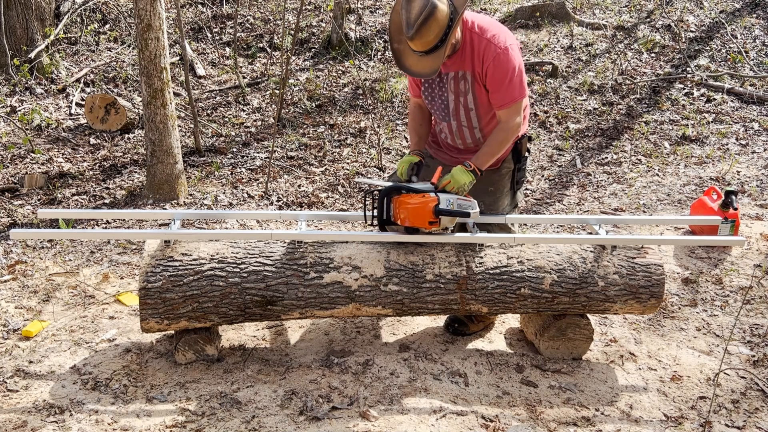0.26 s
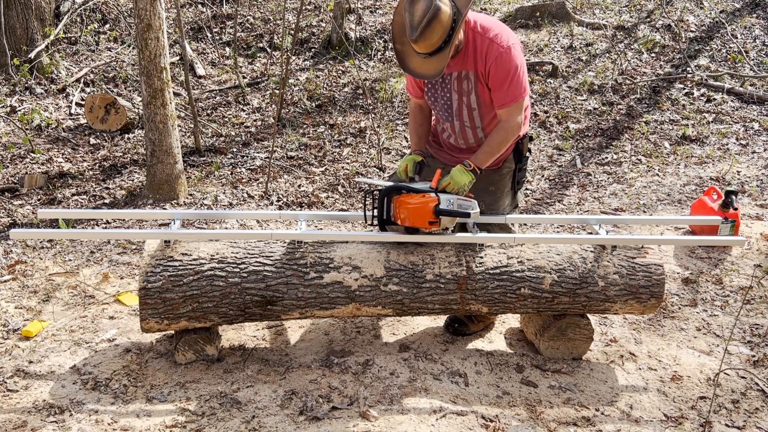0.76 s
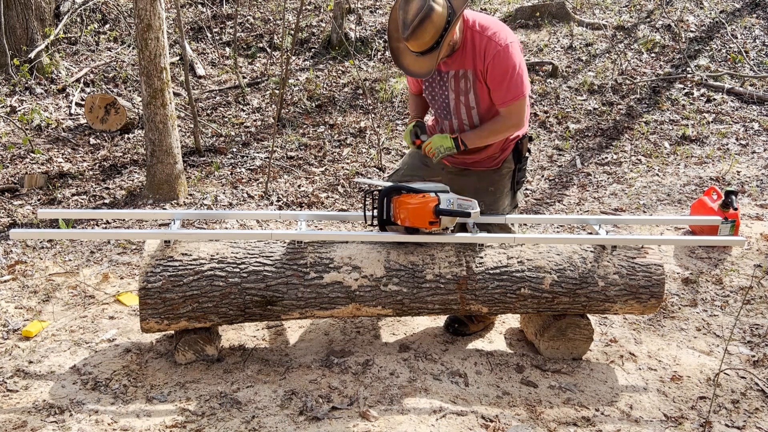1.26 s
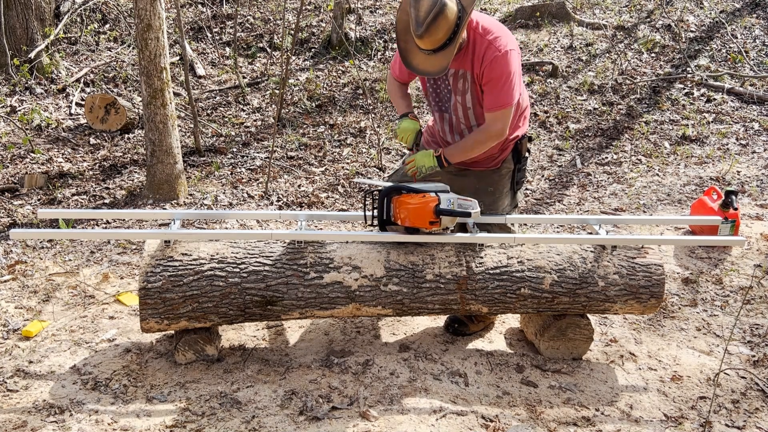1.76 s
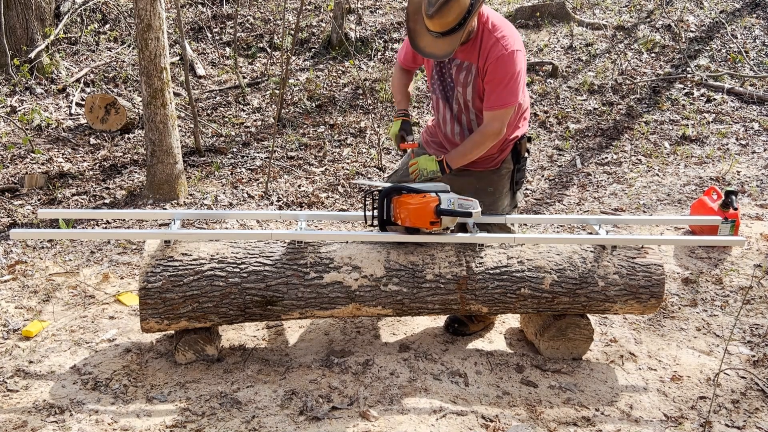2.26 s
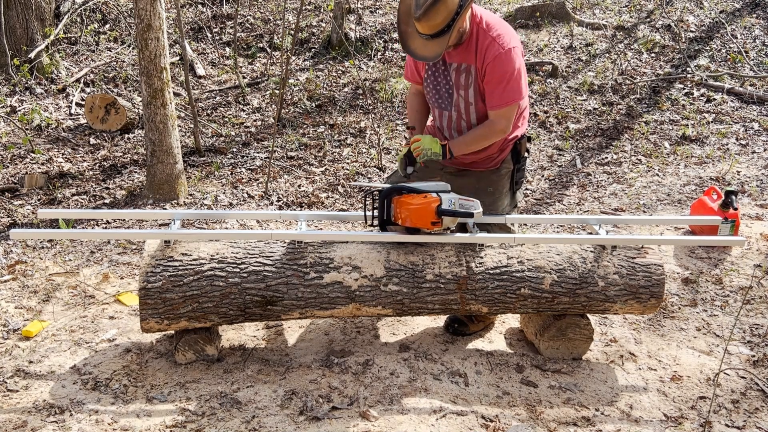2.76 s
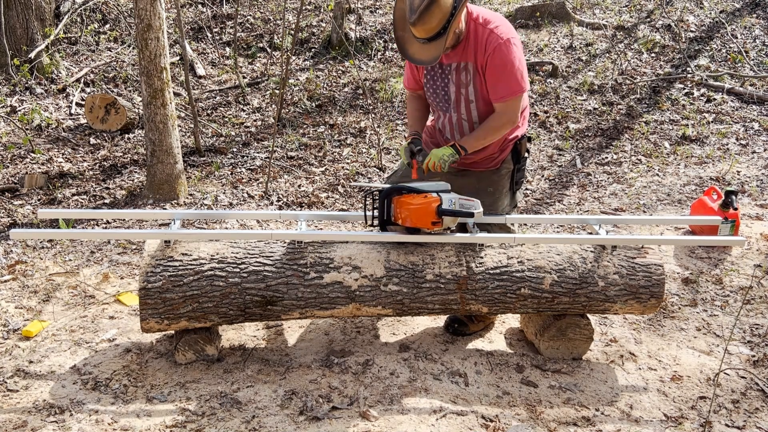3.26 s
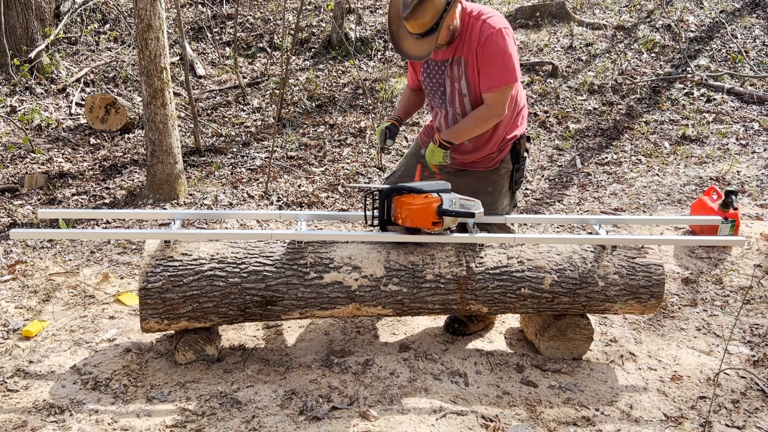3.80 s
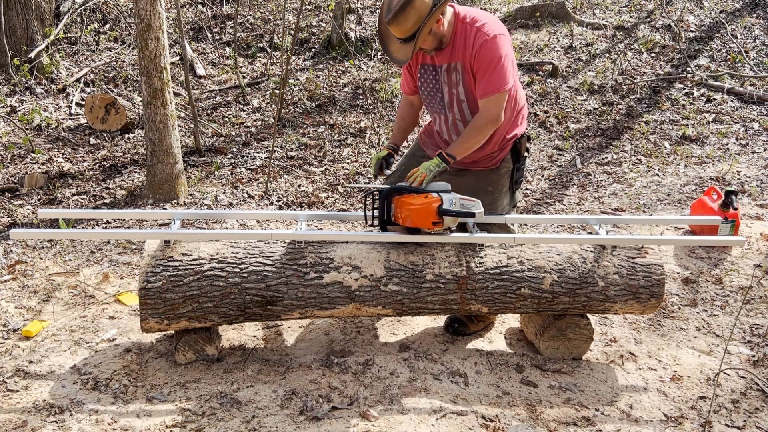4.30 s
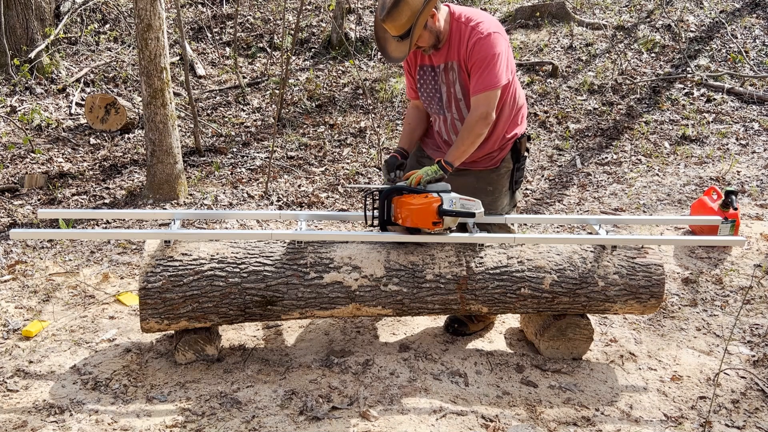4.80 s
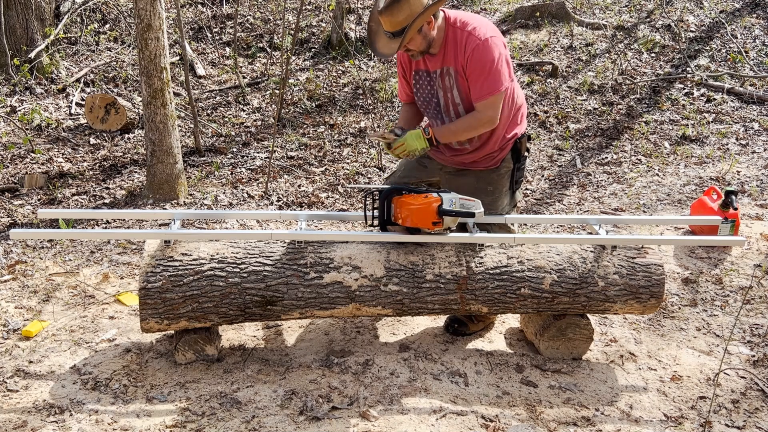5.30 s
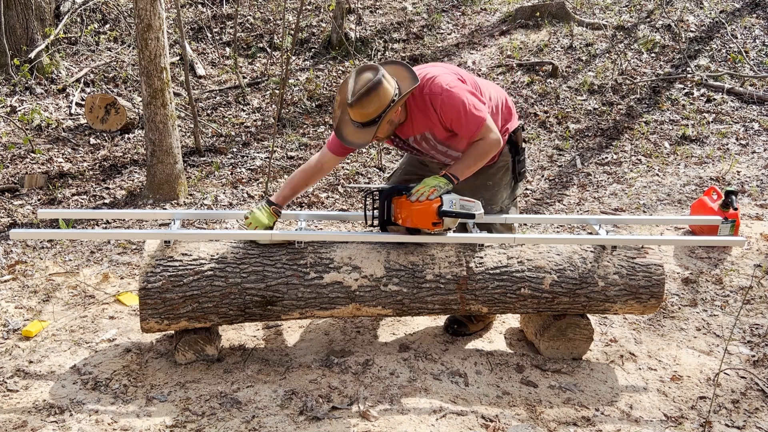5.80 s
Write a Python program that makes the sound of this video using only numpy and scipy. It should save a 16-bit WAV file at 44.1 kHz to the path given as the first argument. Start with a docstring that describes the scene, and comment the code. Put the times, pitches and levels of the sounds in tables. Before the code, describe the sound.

Close handling of small metal parts in a quiet wood. Faint ticks and isolated dry clacks come first, then a tight run of knocks and a bright, jangling steel clatter at its loudest. A dull bump follows, then near silence, glove brushing, and a few short taps on a metal rail. A very high, thin bird whistles upward; faint rumble and blurred animal chorus lie behind. Stereo, mostly dry, with slight tree echo.

```python
"""Work on a chainsaw in a quiet wood

Gloved hands work on a saw lying on a log. Small parts click and tap as noise bursts through resonances, a steel
tool rings against the chain as decaying modes, gloves and hard parts rub as gritty noise, and dull low sounds
are damped tones with noise. A very high bird whistles upward on gliding sines, with short falling chips. Behind lie
shaped noises for a far rumble, a blurred animal chorus and a hiss, dipping briefly early on, and a faint engine."""
import sys
import numpy as np
from scipy import signal
from scipy.fft import rfft, irfft, next_fast_len
from scipy.io import wavfile
from scipy.ndimage import uniform_filter1d

SR = 44100
rng = np.random.default_rng(int(sys.argv[2]) if len(sys.argv) > 2 else 0)


def store_pcm(level_fs):
    """Save levels as 16-bit WAV."""
    pcm = np.round(np.clip(level_fs, -1, 1) * 32767).astype(np.int16)
    wavfile.write(sys.argv[1], SR, np.atleast_2d(pcm).T)


N = 266805  # length in samples

# Contacts of small parts. Each row: start in seconds, knock level in dB, knock pitch in Hz,
# treble tick in dB relative to the knock, casing ring in dB relative to the knock.
CONTACTS = [(.115, -52.5, 1010, 5.5, 2), (0.2119, -49, 1930, 4, -19), (0.216, -47.5, 1500, 0, -4),
            (0.223, -49, 1510, -5, -17), (.345, -56.5, 925, 1.5, -2), (.648, -31.5, 2980, -19, -15),
            (0.811, -54.5, 1940, 9, -18), (0.9624, -34, 3500, -16, -25), (.9638, -25.5, 1880, -29, -8.5),
            (.9652, -27, 955, -33, -12), (1.199, -55.5, 2270, 5.5, -30), (1.581, -51, 3300, -19, -1),
            (1.622, -56, 1500, 0, -2), (1.639, -51, 880, -1, 1), (1.787, -59.5, 1510, -5, -1),
            (1.812, -49.5, 1760, -22, -5), (1.828, -46, 1120, -16, -14), (1.835, -44.5, 1500, -19, -3),
            (2.426, -47.5, 1130, -1.5, -19), (2.642, -52, 2570, 5.5, -2), (2.9292, -18, 1900, -13, -6),
            (3.21, -58.5, 1150, 4.5, 9), (3.341, -28.5, 2000, -27, -5), (3.356, -28, 1870, -5, -9),
            (3.4073, -23.5, 3650, -29, -10.5), (3.466, -31.5, 2220, -17, -30), (3.48, -34.5, 1930, -23, -1),
            (3.764, -52.5, 1000, 9, 5), (3.939, -36.5, 2330, -10, 1), (3.969, -34, 2100, -9, -14.5),
            (3.975, -22, 2040, -8.5, -18), (3.9869, -11, 4200, -8, -9), (3.9906, -16, 1193, -5.5, 1),
            (4.004, -17.5, 4180, -9, -20.5), (4.012, -28, 1797, -14.5, -7), (4.04, -47, 1142, 9, -9.5),
            (4.0494, -27, 12580, -9, -14), (4.0545, -30, 13260, -12, -21), (4.124, -42, 3020, 6, -5.5),
            (4.163, -27, 11970, -2.5, -21), (4.165, -10, 4020, -2.5, -22), (4.1666, -15, 1622, -7, -11.5),
            (4.187, -14.5, 4740, -0.5, -22), (4.2077, -19.5, 6500, 0, -18),
            (4.2142, -25, 5210, -3.5, -19.5), (4.76, -46, 2250, -24, -10), (4.763, -38.5, 1592, -29, -9),
            (5.052, -44.5, 1500, -24, -4), (5.0568, -47.5, 1800, -18, 5), (5.0825, -40, 2140, -3, 3),
            (5.087, -39.5, 1100, -14, -3), (5.141, -49, 1700, -16, -4), (5.745, -44.5, 770, -30, -5.5)]
# Modes of the saw's casing. Each row: pitch in Hz, width in Hz, level in dB.
CASING_MODES = [(1077, 180, 3), (1969, 180, -2), (4350, 260, -9), (4870, 220, -16)]
KNOCK_Q, RING_Q, RING_DB = .8, 11, 1.5  # broad knock, and the knocked part's own short ring
PUSH = 4  # height of the first clean push against noise of rms 1
CONTACT_FALL_S, SHORTER = 0.0086, 0.31  # time to fall 50 dB at 2 kHz; exponent by which higher parts die faster
TICK_HZ, TICK_T60_S = 6000, 0.0028
CASING_LAG_S, CASING_DETUNE, CASING_SCATTER_DB = 0.00149, 0.04, 3.5  # late uptake, shifts by the grip
SMALL_HZ = 780  # small parts radiate little below this

# Parts set down on the metal rail. Each row: start in seconds, level in dB, pitch in Hz.
RAIL_TAPS = [(5.822, -26.5, 2830), (5.832, -31, 2970), (6.012, -20.5, 2890), (6.038, -15.5, 2830)]
TAP_S, TAP_TREBLE_DB = 0.0028, -15.5

# Blows on the loose steel tool. Each row: start in seconds, strength in dB, share of the free ring time
# left by the grip, tilt in dB per octave, loss in dB that the new contact puts on earlier ringing.
BLOWS = [(3.987, -35, 0.22, -2.5, 0), (4.003, -45, 0.27, 3, 4), (4.166, -25.5, 1, 1.5, 0),
         (4.189, -30, 0.41, 4.5, 1), (4.206, -29, 0.86, 5, 11.5)]
# Pitch of each mode of the tool in Hz.
MODE_HZ = [1064, 3540, 4324, 5282, 6422, 6885, 7140, 8117, 9255, 9441, 9801, 10760, 11280, 14302, 14860]
# The same modes. Each row: level in dB, free ring time (t60) in seconds.
MODES = [(2.5, 0.2), (-11.5, 0.13), (-5, .07), (-8, 0.096), (-4, 0.1), (-4, 0.13), (-11.5, 0.28),
         (-14.5, 0.14), (-8.5, 0.17), (-3.5, 0.2), (-7.5, 0.11), (-24.5, 0.37), (-9, 0.055), (-7.5, 0.077),
         (-35.5, .16)]
LINKS, LINK_DB, LINK_T60_S = 60, -9.5, .07  # partials of the chain links: count, top level, middle ring time
# Single ringing tones: soft pings, and lasting rings of the struck steel near 4.0 and 4.2 s.
# Each row: start in seconds, level in dB, pitch in Hz, rise in seconds, t60 in seconds.
SINGLE_TONES = [(1.582, -57, 3546, 0.0017, 0.11), (4.004, -37.5, 4310, .0012, .09),
                (4.012, -51.5, 3530, .006, .17), (4.215, -46.5, 3540, .004, .14),
                (4.3, -53.5, 3534, 0.014, 0.36)]

# Rubbing strokes. Each row: middle in seconds, length in seconds, level in dB, bright share from 0 to 1.
STROKES = [(0.65, 0.024, -51, 0.46), (1.832, 0.039, -67, 0.4), (2.653, 0.038, -60.5, 0.34),
           (3.397, 0.012, -49, 0.18), (3.464, 0.019, -44.5, 0.17), (3.734, 0.21, -72, 0.18),
           (3.977, 0.011, -35, 0.33), (4.013, 0.087, -50, 0.25), (4.204, 0.061, -37, 0.36),
           (5.025, 0.029, -64.5, 0.1), (5.255, 0.074, -48, 0.8), (5.586, 0.059, -52, 0.83),
           (5.845, 0.1, -67.5, 0.4)]
# Spectrum of brushing fabric. Each row: frequency in Hz, relative density in dB per Hz.
FABRIC = [(1760, -45), (3000, -14), (6390, -3), (7910, -4.5), (9330, 0), (9730, -7.5), (15500, -17.5),
          (16200, -31)]
# Spectrum of scraping hard parts. Each row: frequency in Hz, relative density in dB per Hz.
HARD_PARTS = [(240, -58.5), (400, -15.5), (1490, -2.5), (1930, -5.5), (3220, -10), (3810, -7), (4570, -13),
              (9000, -21.5), (11700, -56.5)]
STROKE_EDGE = 2.6  # exponent of the stroke's envelope

# Dull low sounds: bumps of the saw on the log, and the low body of a brushing stroke near 5.2 s.
# Each row: start in seconds, level in dB, pitch in Hz, t60 in seconds, share of noise from 0 to 1.
DULL_SOUNDS = [(4.29, -43.5, 293, 0.058, 0.7), (4.429, -29.5, 163.5, 0.084, 0.36),
               (4.446, -36, 285, 0.044, 0.2), (4.47, -44.5, 194, 0.17, 0.18),
               (4.487, -43.5, 292, 0.075, 0.04), (5.222, -51.5, 580, 0.16, 0.8),
               (5.246, -44.5, 484, 0.094, 0.5), (5.744, -42.5, 402, 0.065, 0.42),
               (5.83, -39, 352, 0.081, 0.34)]
DULL_LOW_HZ = 89  # low cut

# Long notes of the bird. Each row: start in seconds, lowest pitch in Hz, dip into it in Hz,
# seconds until the rise, length in seconds, level in dB before the fade.
NOTES = [(0.479, 11530, 895, 0.011, 0.19, -46.5), (0.648, 12800, 1900, 0.03, 0.13, -47.5),
         (4.884, 11640, 896, 0.0168, .16, -45), (5.052, 12480, 2220, 0.026, .12, -43)]
# Short falling chips of the bird. Each row: start in seconds, end pitch in Hz, level in dB.
FALLING_CHIPS = [(1.814, 13300, -63), (3.815, 13840, -68), (4.663, 14540, -70), (5.95, 14050, -69)]
DIP_S, RISE_HZ_PER_S, RISE_SLOWS = 0.0048, 33000, 1.1  # time constant of the dip; rise and its slowing per s
ATTACK_S, RELEASE_S = 0.024, 0.022
FADE_DB, FADE_S = 21, 0.015  # a note thins out as it climbs
LEAN_HZ, LEAN_DB_PER_KHZ = 13200, -3  # centred pitch; change of left minus right level
CHIP_HZ, CHIP_S = 15940, 0.018  # where a chip starts, its length

# Far engine note. Each row: time in seconds, pitch in Hz, level in dB before the overall swell.
ENGINE = [(1.701, 214.8, -72), (2.1, 231.3, -57), (2.5, 228.3, -65), (2.9, 245.2, -65.5),
          (3.149, 229.1, -59.5), (3.499, 215.2, -64), (3.9, 197, -79)]
# Air of the wood. Each row: time in seconds, rumble in dB, chorus in dB, hiss in dB.
AIR_LEVELS = [(0, -62, -69, -79.5), (.9, -62, -67.5, -78), (1.12, -66, -69, -80), (1.25, -73.5, -74.5, -81),
              (1.55, -68, -67.5, -81.5), (1.75, -60.5, -68, -80.5), (2.5, -62.5, -66, -79.5),
              (3.499, -60, -66, -77.5), (4.5, -60.5, -66.5, -78), (5.2, -61.5, -66, -76),
              (6.05, -58.5, -68.5, -79.5)]
# Spectrum of the far rumble. Each row: frequency in Hz, relative density in dB per Hz.
RUMBLE_SPECTRUM = [(20, -28.5), (33, -48), (82, 0.5), (181, 4), (238, -2), (285, -6), (608, -13),
                   (797, -23.5), (1010, -17), (1300, -18.5), (1500, -28), (1950, -56)]
# Spectrum of the animal chorus. Each row: frequency in Hz, relative density in dB per Hz.
CHORUS_SPECTRUM = [(410, -20.5), (700, 1.5), (999, -2.5), (1300, -11.5), (1450, -3), (1700, -3.5),
                   (2020, 0), (2920, 3), (3370, -5), (3480, -25.5), (4810, -60.5)]
# Spectrum of the hiss. Each row: frequency in Hz, relative density in dB per Hz.
HISS_SPECTRUM = [(2000, -28), (3400, 0), (3810, -13), (4780, -6), (5470, -12.5), (6730, -17), (8620, -16.5),
                 (12500, -19), (15100, -14), (16800, -27)]
# Likeness of the two channels in the air. Each row: frequency in Hz, left-right correlation from -1 to 1.
LIKENESS = [(60, 0.9), (130, 1), (290, 0.86), (640, 0.78), (1410, 0.27), (3100, -0.33), (6820, 0.66),
            (15000, -0.59)]
# Reverberation among the trees. Each row: frequency in Hz, t60 in seconds before each echo's scale.
TREE_DECAY = [(500, 0.32), (3000, 0.17), (14000, 0.18)]
TOP_HZ = 16000  # start of the band limit


def amp(db):
    """Level law: the gain of a level in dB."""
    return 10 ** (np.asarray(db) / 20)


def unit(x):
    """Normalisation: x at rms 1."""
    return x / np.sqrt(np.mean(x ** 2) + 1e-20)


def along(points, hz):
    """Interpolation of (Hz, value) points on a logarithmic frequency axis."""
    f, v = np.transpose(points)
    return np.interp(np.log(hz + 1), np.log(f + 1), v)


def filtered(x, response):
    """Linear filtering: the spectrum of x times a complex response of frequency."""
    n = x.shape[-1]
    m = next_fast_len(n + 4096)  # room for the tail
    return irfft(rfft(x, m) * response(np.fft.rfftfreq(m, 1 / SR)), m)[..., :n]


def high_pass(x, order, hz):
    """Low cut by a maximally flat filter."""
    return signal.sosfilt(signal.butter(order, hz, "high", fs=SR, output="sos"), x)


def resonance(hz, q):
    """Damped oscillator: a causal band-pass of peak gain 1."""
    return lambda f: 1j * f * hz / q / (hz * hz - f * f + 1j * f * hz / q)


def add(out, s, x):
    """Superposition: lays x into a stereo track at time s."""
    part = out[:, max(round(s * SR), 0):][:, :x.shape[-1]]
    part += x[..., :part.shape[1]]


def drift(shape, size):
    """Slow random motion of rms 1: noise averaged twice over size samples."""
    once = uniform_filter1d(rng.standard_normal(shape), size=size)
    return unit(uniform_filter1d(once, size=size))


def patches(shape, bins, frames):
    """Random field over frequency and time, averaged over neighbouring bins and frames."""
    field = uniform_filter1d(rng.standard_normal(shape), size=bins, axis=0)
    return unit(uniform_filter1d(field, size=frames, axis=1))


def whistle(hz, waver):
    """Frequency modulation: a sine on a pitch curve with a slightly unsteady pitch."""
    shake = waver * unit(uniform_filter1d(rng.standard_normal(len(hz)), size=60))
    return np.sin(2 * np.pi * np.cumsum(hz * (1 + shake)) / SR)


def casing_ring(force):
    """Modal response: the casing takes up the blow late, its modes at new strengths and pitches."""
    sizes = amp(np.transpose(CASING_MODES)[2] + CASING_SCATTER_DB * rng.standard_normal(len(CASING_MODES)))
    tunes = 1 + CASING_DETUNE * rng.standard_normal(len(CASING_MODES))

    def response(f):
        modes = sum(size * resonance(hz * tune, hz / width)(f)
                    for size, tune, (hz, width, _) in zip(sizes, tunes, CASING_MODES))
        return modes * np.exp(-2j * np.pi * f * CASING_LAG_S)
    return filtered(force, response)


def clicks():
    """Impact excitation: a brief force drives the knocked part, with a treble tick and a rattle after."""
    out, t = np.zeros((2, N)), np.arange(4096) / SR
    for s, db, hz, treble_db, casing_db in CONTACTS:
        noise = rng.standard_normal((3, len(t)))
        # the first touch is one clean push, before the scatter of smaller contacts
        noise[0] += PUSH * np.exp(-((t - .0005) * 6 * hz) ** 2)
        quick = t * (hz / 2000) ** SHORTER
        u = quick / CONTACT_FALL_S
        # the force jumps up, then dies ever faster; the second term is the rattle
        fade = (1 - np.exp(-quick / 0.0021)) * (amp(-35 * u - 15 * u ** 2) + amp(-26.5 - 60 * t / 0.08))
        force = noise[0] * fade

        def part(f):
            body = resonance(hz, KNOCK_Q)(f) ** 2 / (1 + 1j * f / (3.7 * hz)) ** 2
            return body + amp(RING_DB) * resonance(hz, RING_Q)(f)
        knock, ring = filtered(force, part), casing_ring(force)
        knock = knock / abs(knock).max() + amp(casing_db) * ring / abs(ring).max()
        # short waves reach the two channels by partly different paths
        wide = noise[1] + 0.31 * noise[2] * [[1], [-1]]
        tick_fade = fade * (0.12 + amp(-60 * t / TICK_T60_S))
        tick = filtered(wide * tick_fade, lambda f: resonance(TICK_HZ, q=.7)(f) ** 3)
        add(out, s, amp(db) * knock + amp(db + treble_db) * tick / abs(tick).max())
    return high_pass(out, 4, SMALL_HZ)


def taps():
    """Short contact on metal: a pitched spindle, a starting tick and a faint buzz, a little to the left."""
    out, t = np.zeros((2, N)), np.arange(2048) / SR
    for s, db, hz in RAIL_TAPS:
        noise = rng.standard_normal((2, len(t)))
        spindle = np.sin(np.pi * np.clip(t / TAP_S, 0, 1)) ** 2 * np.sin(2 * np.pi * hz * t)
        low = unit(filtered(noise[0], lambda f: resonance(hz, q=1.2)(f) ** 2))
        high = unit(filtered(noise[1], lambda f: resonance(4500, q=.9)(f) ** 3))
        buzz = amp(-13 - 60 * t / 0.012) * low
        tick = amp(TAP_TREBLE_DB - 60 * t / 0.012) * high
        add(out, s, amp(db) * (spindle + buzz + tick) * amp([[.7], [-.7]]))
    return out


def chain_links(t, free, tilt_db, middle_hz):
    """Many small resonators: short partials of the chain links, drawn anew at each blow."""
    pitch, weakness, length = rng.random((3, LINKS, 1))
    hz = 1500 * 10 ** pitch
    t60 = free * LINK_T60_S * (.5 + length)
    size = amp(LINK_DB - 8.6 * weakness + tilt_db * np.log2(hz / middle_hz) - 60 * t / t60)
    return (1 - amp(-t * 10 ** 4)) * (size * np.sin(2 * np.pi * hz * t)).sum(axis=0)


def tool():
    """Modal vibration: each blow rings the steel modes at new strengths, and a later touch damps them."""
    out, t = np.zeros((2, N)), np.arange(SR // 2) / SR
    hz = np.array(MODE_HZ)[:, None]
    level_db, t60 = np.transpose(MODES)[:, :, None]
    middle_hz = np.median(hz)
    for s, db, free, tilt_db, _ in BLOWS:
        choke_db = sum(loss_db * np.clip((s + t - later) / .004, 0, 1)
                       for later, *_, loss_db in BLOWS if later > s)
        start_db = level_db + tilt_db * np.log2(hz / middle_hz) + 2 * rng.standard_normal(hz.shape)
        size = amp(start_db - 60 * t / (free * t60) - choke_db)
        add(out, s, amp(db) * chain_links(t, free, tilt_db, middle_hz))
        # each mode leads by some microseconds in one channel
        lead = .000008 * rng.standard_normal(hz.shape) * np.array([1, -1])[:, None, None]
        # loose contact with the casing makes the ring flutter
        size = size * amp(2.5 * drift(size.shape, 300))
        ring = (size * np.sin(2 * np.pi * hz * (t + lead))).sum(axis=1)
        add(out, s, amp(db) * (1 - np.exp(-t / 0.00028)) * ring)
    return out


def single_tones():
    """Single damped modes: soft pings and lasting rings of the struck steel, with an uneven decay."""
    out, t = np.zeros((2, N)), np.arange(SR // 2) / SR
    for s, db, hz, rise, t60 in SINGLE_TONES:
        decay = amp(db + 2.5 * drift(len(t), 500) - 60 * t / t60)
        add(out, s, decay * (1 - np.exp(-t / rise)) * np.sin(2 * np.pi * hz * t))
    return out


def rubs():
    """Friction noise under a smooth stroke: fabric hisses bright and wide, hard parts scrape lower."""
    z = signal.stft(rng.standard_normal((3, N)), nperseg=128)[2]
    # fibres and teeth catch one by one, each at its own pitch
    catches = amp(4.5 * patches(z.shape[1:], bins=2, frames=7))
    grit = signal.istft(z * catches, nperseg=128)[1][:, :N]
    grit = grit * amp(1.5 * unit(uniform_filter1d(rng.standard_normal(N), size=60)))
    wide = grit[0] + 0.41 * grit[1] * [[1], [-1]]
    bright = unit(filtered(wide, lambda f: amp(along(FABRIC, f))))
    dull = unit(filtered(grit[2], lambda f: amp(along(HARD_PARTS, f))))
    t, out = np.arange(N) / SR, np.zeros((2, N))
    for s, length, db, share in STROKES:
        stroke = np.exp(-abs((t - s) / (length / 2)) ** STROKE_EDGE)
        out += amp(db) * stroke * (share * bright + (1 - share) * dull)
    return out


def dull_sounds():
    """Heavily damped vibration: bumps on the log and a brush's low body, each a soft tone with a low puff."""
    out, t = np.zeros((2, N)), np.arange(8192) / SR
    for s, db, hz, t60, share in DULL_SOUNDS:
        puff = unit(filtered(rng.standard_normal(len(t)), lambda f: resonance(1.5 * hz, q=.6)(f) ** 2))
        envelope = amp(db - 60 * t / t60) * (1 - np.exp(-(t / 0.0024) ** 2))
        add(out, s, envelope * ((1 - share) * np.sin(2 * np.pi * hz * t) + share * puff))
    return high_pass(out, 2, DULL_LOW_HZ)


def bird():
    """Gliding pure tones: notes dip quickly and rise long, two to a call, and a few short chips fall."""
    out = np.zeros((2, N))
    for s, low_hz, dip_hz, turn, length, db in NOTES:
        t = np.arange(0, length, 1 / SR)
        climb = np.clip(t - turn, 0, None)
        rise_hz = RISE_HZ_PER_S * climb * (1 - RISE_SLOWS * climb)
        hz = low_hz + dip_hz * np.exp(-t / DIP_S) + rise_hz
        edges = np.clip(t / ATTACK_S, 0, 1) * np.clip((length - t) / RELEASE_S, 0, 1) ** 2
        level = amp(db - FADE_DB * (1 - np.exp(-climb / FADE_S)))
        tone = level * edges * whistle(hz, waver=0.0043)
        # short waves: low pitches come out left, high ones right
        pan_db = LEAN_DB_PER_KHZ * (hz - LEAN_HZ) / 1000 / 2
        add(out, s, tone * amp([pan_db, -pan_db]))
    u = np.linspace(0, 1, round(CHIP_S * SR))
    for s, end_hz, db in FALLING_CHIPS:
        hz = end_hz + (CHIP_HZ - end_hz) * (1 - u) ** 2
        add(out, s, amp(db) * np.sin(np.pi * u) * whistle(hz, waver=0.008))
    return out


def echo(x, scale):
    """Diffuse scattering from trunks and ground, each frequency dying at its own speed."""
    hz, t, z = signal.stft(rng.standard_normal((2, SR // 2)), SR, nperseg=256)
    t60 = scale * along(TREE_DECAY, hz)[:, None]
    tail = signal.istft(z * amp(-60 * t / t60), SR, nperseg=256)[1]
    return signal.fftconvolve(x, tail / np.linalg.norm(tail[0]), axes=1)[:, :N]


def drone():
    """Harmonic orders of a far engine: two unsteady low tones swell and fade together."""
    s, hz, db = np.transpose(ENGINE)
    t = np.arange(s[0], s[-1], 1 / SR)
    flutter_db = 0.73 * drift(len(t), 1500)
    pitch = np.interp(t, s, hz)
    # two neighbouring orders of the engine, the fifth and the fourth
    orders = whistle(pitch, waver=.02) + .7 * whistle(pitch * 4 / 5, waver=.02)
    out = np.zeros((2, N))
    add(out, s[0], amp(np.interp(t, s, db) + flutter_db) * np.hanning(len(t)) ** 0.48 * orders)
    return out


def rush(spectrum, patchy_db):
    """Partly coherent stereo noise of rms 1: patches of random gain, likeness set by mid and side."""
    z = signal.stft(rng.standard_normal((2, N)), nperseg=512)[2]
    gains = amp(patchy_db * patches(z.shape[1:], bins=5, frames=10))
    pair = signal.istft(z * gains, nperseg=512)[1][:, :N]

    def response(hz):
        turn = np.arccos(np.clip(along(LIKENESS, hz), -1, 1)) / 2
        return amp(along(spectrum, hz)) * [np.cos(turn), np.sin(turn)]
    mid, side = filtered(pair, response)
    return unit(np.array([mid + side, mid - side]))


def wood():
    """Sum of incoherent noises: far rumble, a chorus band and a faint even hiss."""
    s, *levels = np.transpose(AIR_LEVELS)
    rumble_db, chorus_db, hiss_db = [np.interp(np.arange(N) / SR, s, level) for level in levels]
    rumble = amp(rumble_db) * rush(RUMBLE_SPECTRUM, patchy_db=1.8)
    chorus = amp(chorus_db) * rush(CHORUS_SPECTRUM, patchy_db=0.8)
    hiss = amp(hiss_db) * rush(HISS_SPECTRUM, patchy_db=.3)
    return rumble + chorus + hiss


def scene():
    """Direct and scattered sound: near work with a little echo, the bird deeper among the trees."""
    work = clicks() + taps() + tool() + single_tones() + rubs() + dull_sounds()
    song = bird()
    near = work + amp(-11.5) * echo(work, scale=0.52)
    deep = song + amp(4.0) * echo(song, scale=0.73)
    return near + deep + drone() + wood()


def record(dry):
    """Band limitation: a steep fall above the limit, and nothing from 900 Hz above it."""
    return filtered(dry, lambda hz: amp(-np.clip(hz - TOP_HZ, 0, None) / 25) * (hz < TOP_HZ + 900))


dry = scene()
out = record(dry)
store_pcm(out)
```